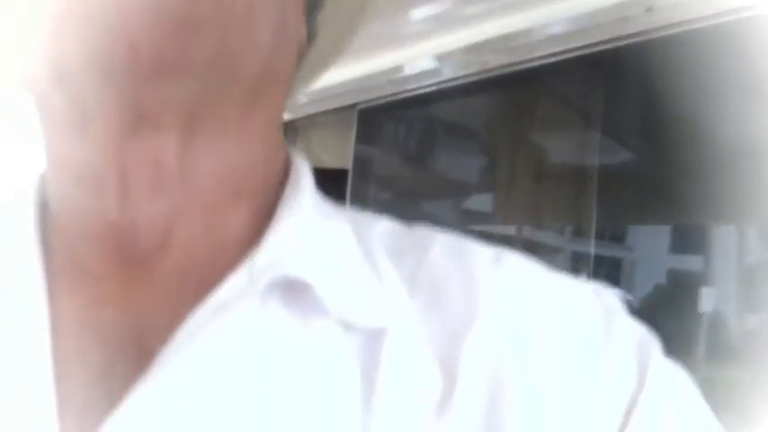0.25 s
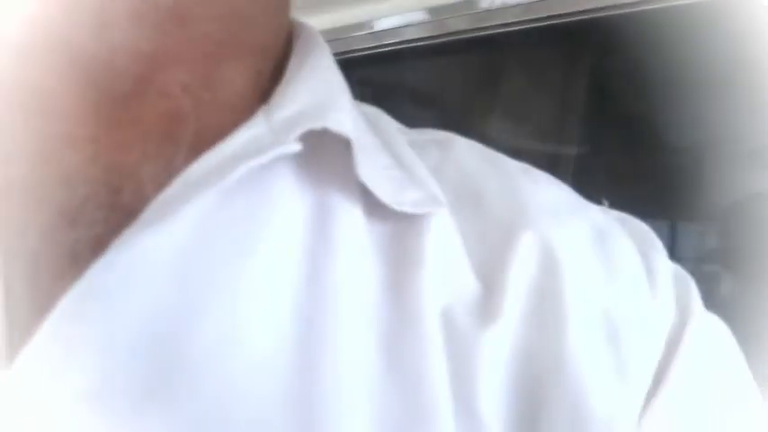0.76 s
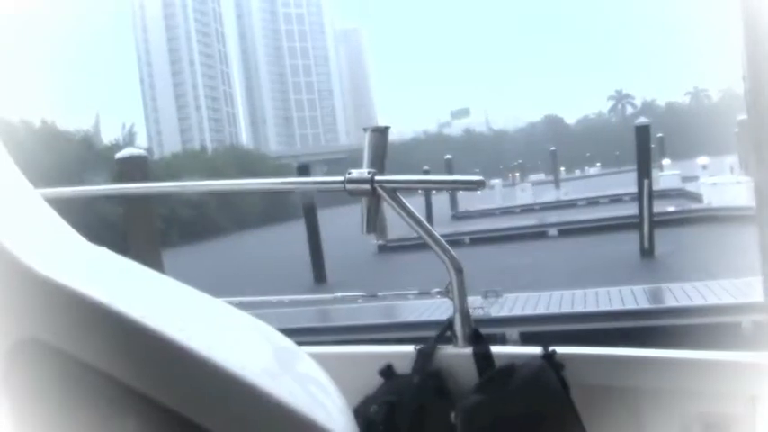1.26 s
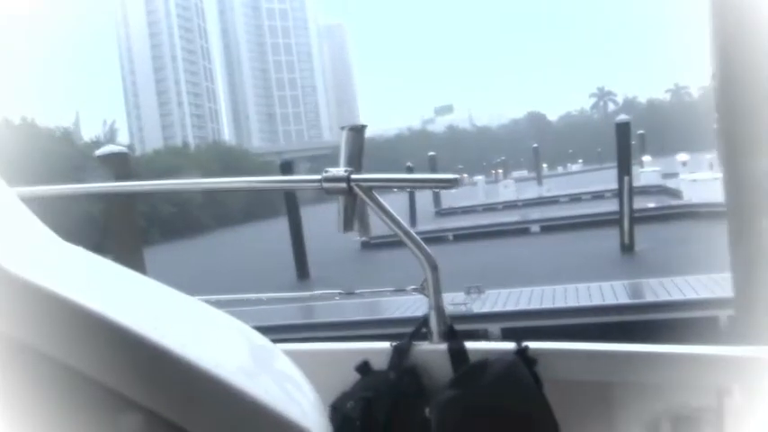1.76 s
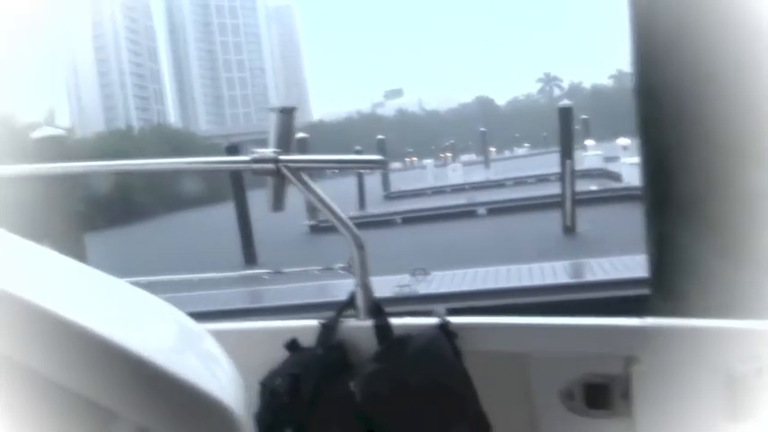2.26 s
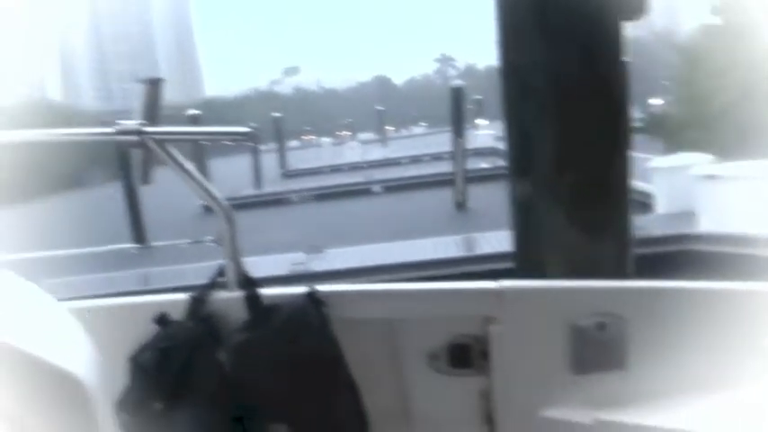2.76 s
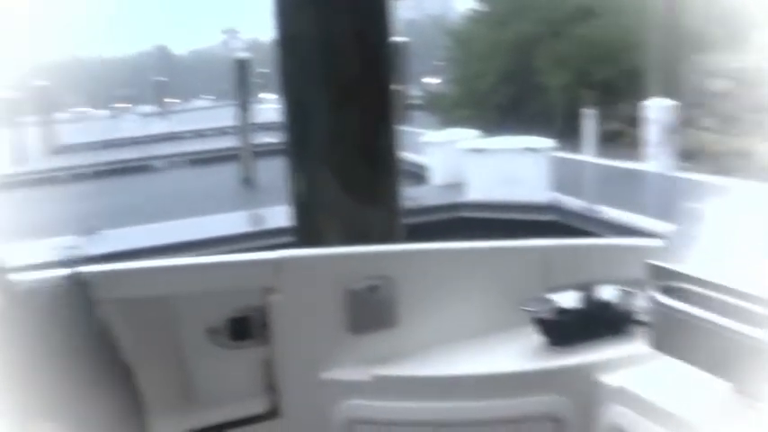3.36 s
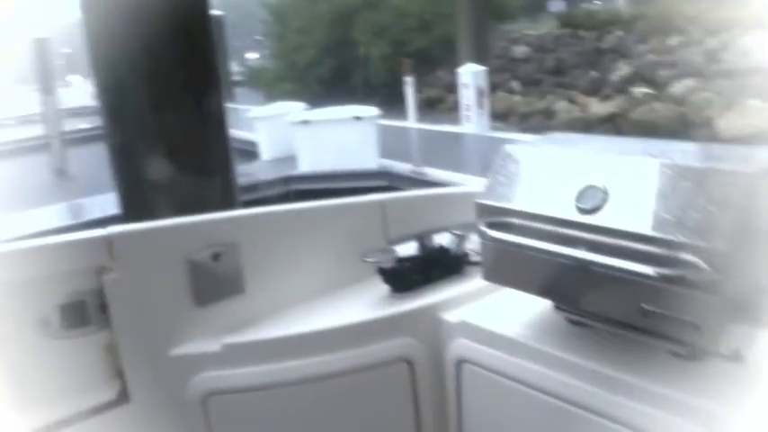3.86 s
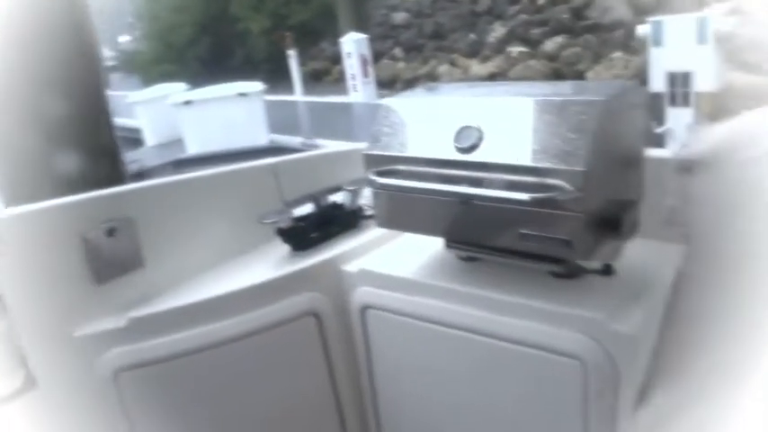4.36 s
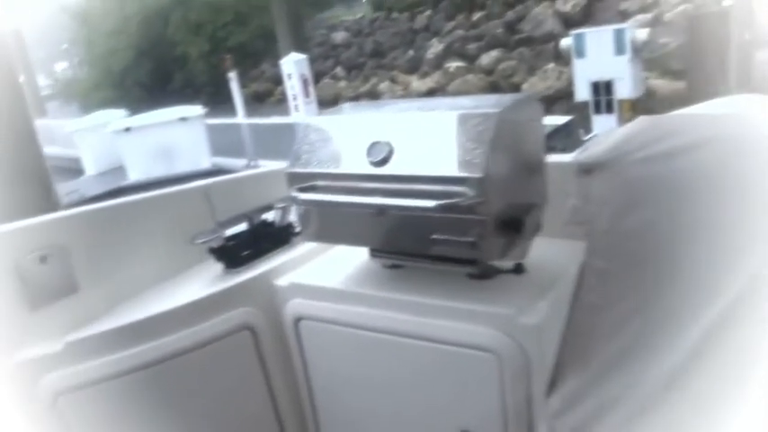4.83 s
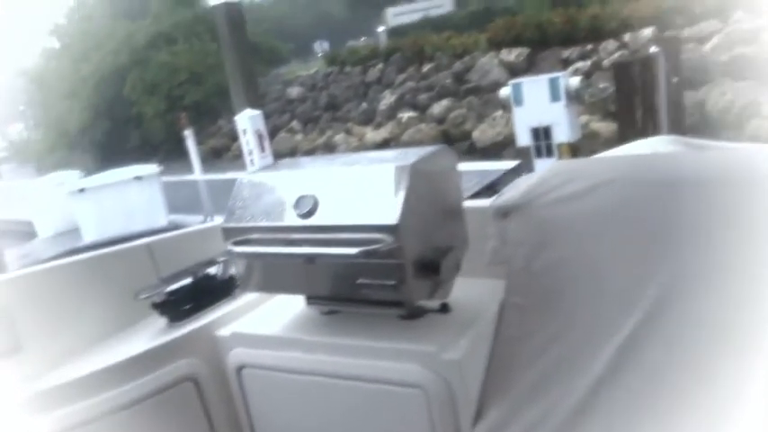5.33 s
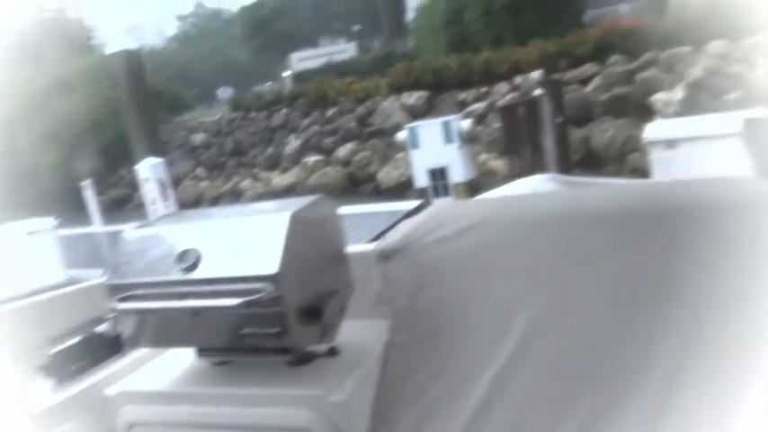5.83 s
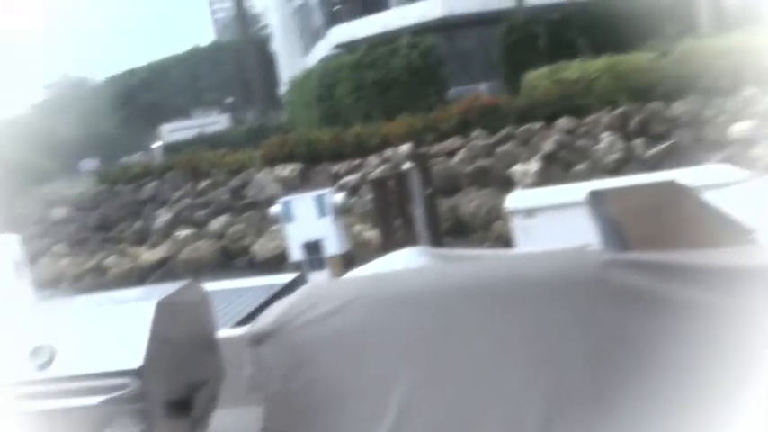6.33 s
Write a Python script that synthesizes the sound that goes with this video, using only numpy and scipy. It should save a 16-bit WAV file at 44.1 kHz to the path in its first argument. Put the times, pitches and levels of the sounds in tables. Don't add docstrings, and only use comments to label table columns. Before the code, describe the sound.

At 0 s a dull, quickly damped low knock around 200 Hz opens the sound, over very loud rain drumming on a hard boat roof close overhead. The roar is dense, strong in the mids around 1 to 3 kHz, with peaks flattened by overload; small splats come near 0.5 and 0.93 s. From 1.08 to 1.16 s it fades, leaving a near-silent gap until 1.2 s. By 1.29 s a clearly quieter, wider rain has risen: soft roof drumming, fine fizz on water, hollow hull boom, continuing without a break. Low rumble swells around 3.25 s, dips near 4.3 s and returns about 5.75 s, while boom and drumming grow slightly. Bright runoff splats fall at 1.34, 1.44, 2.0, 3.3, 3.8, 4.8 and 5.0 s; a harder triple gush knocks the deck at 5.3 s, more splats at 5.9, 6.25 and 6.55 s.

```python
import sys
import numpy as np
from scipy import signal
from scipy.fft import rfft, irfft, next_fast_len
from scipy.io import wavfile
from scipy.ndimage import uniform_filter1d, map_coordinates

SR = 44100
rng = np.random.default_rng(int(sys.argv[2]) if len(sys.argv) > 2 else 0)


def transcribe(u):
    v = np.clip(np.atleast_2d(u).T, -1, 1)
    q = np.round(v * 32767).astype(np.int16)
    wavfile.write(sys.argv[1], SR, q)


def boost_factor(decibels):
    exponent = np.asarray(decibels, float) / 20
    return 10 ** exponent


N = 290619
T = np.arange(N) / SR

# frequency in Hz, level in dB.
HULL_TONE = [
    [(15, -71), (25, -43), (59, -36), (108, -10), (182, -7), (230, -3), (270, -4), (382, -0.5), (549, -5.5),
     (800, 5.5), (1040, -32), (1760, -120)],
    [(15, -61), (25, -40), (102, -14), (177, -2), (290, -1), (330, 1), (355, 0), (496, -5), (533, 2.5),
     (800, 15), (1040, -13), (1760, -120)],
]
# frequency in Hz, level in dB.
ROOF_TONE = [
    [(220, -34), (380, -11), (551, -12.5), (946, -3), (1280, -3), (1470, -2), (2060, -0.5), (2880, -7),
     (4000, -20.5), (5600, -33), (7280, -57), (12300, -120)],
    [(220, -35), (380, -9), (498, -9.5), (539, -23), (884, -9.5), (1500, -8), (2300, -6.5), (2820, -9),
     (3910, -19), (5600, -45), (7280, -46), (12300, -120)],
]
# frequency in Hz, level in dB.
FIZZ_TONE = [
    [(1880, -30), (3200, -6.5), (3480, 0.5), (4010, -11.5), (5030, -16.5), (7410, -17.5), (9360, -24),
     (15000, -37.5)],
    [(1880, -22), (3200, 1), (5470, -13), (8890, -13.5), (10200, -19.5), (13900, -25), (15000, -30.5)],
]
# frequency in Hz, side minus mid in dB.
STEREO_WIDTH = [
    [(60, -30), (110, -45), (200, -62), (380, -48), (700, -13), (1290, -7.5), (2380, -12), (4400, 5),
     (8120, -5), (15000, -5)],
    [(60, -29), (110, -33), (200, -39), (380, -15), (700, -3), (1290, -1.5), (2380, -8.5), (4400, 2.5),
     (8120, -5), (15000, -6.5)],
]
# frequency in Hz, left minus right in dB.
STEREO_LEAN = [
    [(60, 0.0), (110, 0.0), (200, 0.0), (380, -3.5), (700, -2.5), (1290, 0.5), (2380, -1), (4400, 0.5),
     (8120, 0.5), (15000, 7)],
    [(60, 0.0), (110, -1), (200, 2), (380, -8.5), (700, 2.5), (1290, 1.0), (2380, 1.5), (4400, 2),
     (8120, 0.5), (15000, 0.0)],
]
# frequency in Hz, lead of the left in radians.
LEFT_LEAD = [
    [(600, 0), (1600, .5), (3500, .6), (4500, 1), (7000, 0)],
    [(700, 0), (1500, -.3), (2700, -.6), (3600, -1), (4500, -1.3), (7500, 0)],
]

# rumble, hull boom, roof drum and water fizz, all in dB.
PART_LEVELS = [(-36, -23, -11, -30.5), (-47, -33.5, -20.5, -32)]
# time in seconds, level in dB.
HULL_SWELL = [(0.1, 3.5), (0.4, -4), (0.65, -5.5), (1.02, -3.5), (1.6, 1), (2.5, -0.5), (3.25, 5),
              (3.65, -3.5), (4.3, -6.5), (5.05, -0.5), (5.75, 2), (6.5, -1)]
SWELL_SHARES = [(1, 0.075, 0.013, 0.015), (1.1, 0.49, .05, 0)]
# rumble, boom, drum, fizz in dB/s.
TURN_DRIFTS = [(-0.026, 0, 0, 0), (-0.41, 0.32, .1, 0.067)]

# start in seconds, peak in dB, spray pitch in Hz.
RUNOFF = [(0.5092, -24, 5350), (0.926, -16.5, 7140), (0.9494, -28, 5070), (1.3364, -16.5, 8800),
          (1.4361, -22, 6450), (2.0268, -26, 6640), (3.272, -17.5, 7600), (3.76, -21.5, 9190),
          (4.7894, -25, 8180), (4.9894, -28, 8040), (5.8994, -24, 8650), (6.2524, -22, 6170),
          (6.2744, -22, 7570), (6.565, -19, 6530)]
# start in seconds, peak in dB, spray pitch in Hz.
GUSH_SPURTS = [
    (5.2959, -18, 9300),
    (5.303, -21, 9300),
    (5.313, -23, 9500),
]
# deck knock in dB, decay t60 in seconds, left minus right in dB.
SPLAT_BUILD = (-3, 0.044, .8)
# deck knock in dB, t60 in seconds, left minus right in dB.
GUSH_BUILD = (8, .08, 0)
# centre in Hz, width in Hz, level in dB.
SPRAY_BANDS = [(4800, 2500, -3), (14000, 3000, -18)]
# centre in Hz, width in Hz, level in dB.
DECK_PANEL = [(2700, 1200, 6)]
# start in seconds, pitch in Hz, level in dB, decay t60 in seconds.
HULL_KNOCK = (.002, 200, 0, .06)

# start, point aimed at for silence, and early cut, all in seconds.
LEAVING = (1.075, 1.185, 1.1595)
# start of the rise, full level, and opening of the sound, all in seconds.
ENTERING = (1.188, 1.29, 1.2)

RUMBLE_TOP_HZ, BOOM_TOP_HZ, DRUM_TOP_HZ = 140, 550, 4200


def unit(x):
    return x / np.sqrt(np.mean(x ** 2) + 1e-20)


def along(points, hz):
    f, v = np.transpose(points)
    return np.interp(np.log(hz + 1), np.log(f + 1), v)


def filtered(x, response):
    m = next_fast_len(x.shape[-1] + 8192)
    spectrum = rfft(x, m) * response(np.fft.rfftfreq(m, 1 / SR))
    return irfft(spectrum, m)[..., :x.shape[-1]]


def resonant(modes):
    def response(f):
        total = 0
        for k, (centre, width, db) in enumerate(modes):
            damping = 1j * f * width
            total = total + (-1) ** k * boost_factor(db) * damping / (centre * centre - f * f + damping)
        return total
    return response


def above(hz, edge_hz):
    return 1 / (1 + (edge_hz / (hz + 1)) ** 8)


def downpour():
    far = sheets(patchy_db=0.64)
    near = patter(spread_db=-0.5, t60=0.013, count=6000)

    def near_share(hz):
        return np.clip(0.13 + 0.14 * above(hz, DRUM_TOP_HZ), 0, 1)

    fall = filtered(far, lambda hz: np.sqrt(1 - near_share(hz)))
    fall = fall + filtered(near, lambda hz: np.sqrt(near_share(hz)))
    gusts = map_coordinates(rng.standard_normal(80), [T * 11])
    return boost_factor(0.3 * gusts) * fall


def patter(spread_db, t60, count):
    when, luck = rng.random((count, 2)).T
    drop_power = boost_factor(-2 * spread_db * np.log(luck + 1e-3))
    hits = np.bincount((when * N).astype(int), drop_power, N)
    decay = boost_factor(-120 * T[:SR // 20] / t60)
    power = signal.fftconvolve(hits, decay)[:N]
    return unit(np.sqrt(np.abs(power))) * rng.standard_normal((2, N))


def sheets(patchy_db):
    z = signal.stft(rng.standard_normal((2, N)), nperseg=512)[2]
    patches = uniform_filter1d(rng.standard_normal(z.shape[1:]), size=14, axis=0)
    patches = uniform_filter1d(patches, size=8, axis=1)
    return unit(signal.istft(z * boost_factor(patchy_db * unit(patches)), nperseg=512)[1][:, :N])


def boat_parts(fall, view):
    def rumble(hz):
        return boost_factor(along(HULL_TONE[view], hz)) * (1 - above(hz, RUMBLE_TOP_HZ))

    def boom(hz):
        return boost_factor(along(HULL_TONE[view], hz)) * (above(hz, RUMBLE_TOP_HZ) - above(hz, BOOM_TOP_HZ))

    def drum(hz):
        return boost_factor(along(ROOF_TONE[view], hz)) * (above(hz, BOOM_TOP_HZ) - above(hz, DRUM_TOP_HZ))

    def fizz(hz):
        return boost_factor(along(FIZZ_TONE[view], hz)) * above(hz, DRUM_TOP_HZ)

    return [filtered(fall, part) for part in (rumble, boom, drum, fizz)]


def rain_on_boat(fall, view):
    fall = filtered(fall, lambda hz: boost_factor([0 * hz, along(STEREO_WIDTH[view], hz)]))
    parts = boat_parts(fall, view)
    swell_db = np.interp(T, *np.transpose(HULL_SWELL))
    settings = zip(PART_LEVELS[view], SWELL_SHARES[view], TURN_DRIFTS[view])
    dbs = [db + share * swell_db + drift * (T - 3.9) for db, share, drift in settings]

    belly = filtered(parts[2], lambda hz: 1 - above(hz, 900))
    parts[2] = parts[2] + (boost_factor(dbs[1] - PART_LEVELS[view][1]) - 1) * belly
    mid, side = sum(boost_factor(db) * part / np.std(part[0]) for db, part in zip(dbs, parts))

    def port(hz):
        tilt = boost_factor(along(STEREO_LEAN[view], hz) / 2) * np.exp(0.5j * along(LEFT_LEAD[view], hz))
        return tilt ** above(hz, BOOM_TOP_HZ)

    return filtered(np.array([mid + side, mid - side]), lambda hz: np.array([port(hz), 1 / port(hz)]))


def splats():
    out, t = np.zeros((2, N + SR)), T[:SR // 4]
    events = [row + SPLAT_BUILD for row in RUNOFF] + [row + GUSH_BUILD for row in GUSH_SPURTS]
    for start, db, hz, knock_db, t60, pan_db in events:
        envelope = boost_factor(db - 60 * t / max(t60, 0.005)) * (1 - np.exp(-t / 0.0006))
        shape = envelope * boost_factor([[pan_db / 2], [-pan_db / 2]])
        a, b, c, d = rng.standard_normal((4, len(t)))
        ping = resonant([(hz, 190 / t60, 2)])
        pitched = filtered(shape * [a + 0.5 * b, a - 0.5 * b], lambda f: ping(f) ** 2)
        broad = filtered(boost_factor(1) * shape * [c + d, c - d], resonant(SPRAY_BANDS))
        knock = filtered(shape * boost_factor(knock_db) * a[::-1], resonant(DECK_PANEL))
        i = round(start * SR)
        out[:, i:i + len(t)] += pitched + broad + knock
    return out[:, :N]


def hull_knock():
    start, hz, db, t60 = HULL_KNOCK
    t = np.maximum(T - start, 0)
    return boost_factor(db - 60 * t / t60) * (1 - np.exp(-t / 0.005)) * np.sin(2 * np.pi * hz * t)


def scene():
    fall = downpour()
    under_roof = rain_on_boat(fall, 0) + hull_knock()
    facing_water = rain_on_boat(fall, 1)
    return np.where(T < ENTERING[0], under_roof, facing_water) + splats()


def low_pass(x):
    return signal.sosfilt(signal.butter(12, 15800, fs=SR, output="sos"), x)


def record(dry):
    remnant = boost_factor(-30 - 900 * np.maximum(T - LEAVING[2], 0))
    closing = np.clip((LEAVING[2] - T) / 0.0006 + 0.5, 0, 1)
    leaving = np.interp(T, LEAVING[:2], [1, 0]) * np.maximum(closing, remnant)
    opening = np.clip((T - ENTERING[2]) / 0.006, 0, 1)
    entering = np.interp(T, ENTERING[:2], [0, 1]) * opening
    return low_pass(np.clip(dry, -1, 1) * (leaving + entering))


dry = scene()
out = record(dry)
transcribe(out)
```